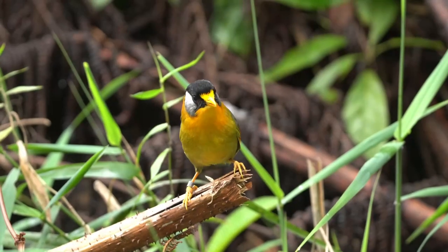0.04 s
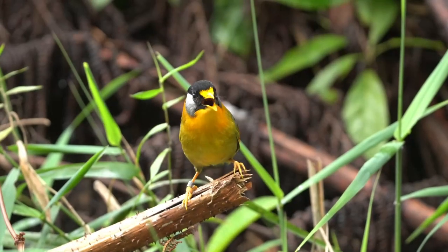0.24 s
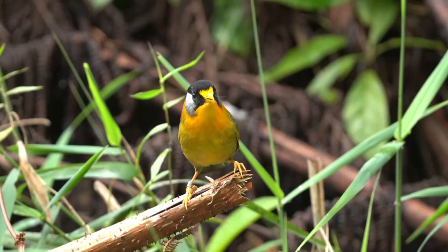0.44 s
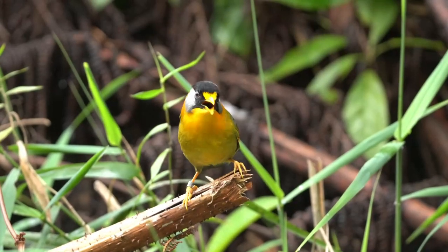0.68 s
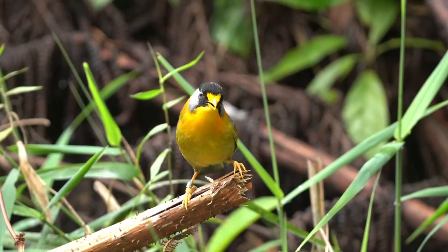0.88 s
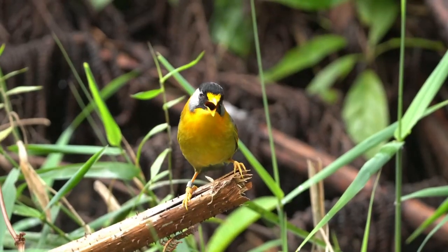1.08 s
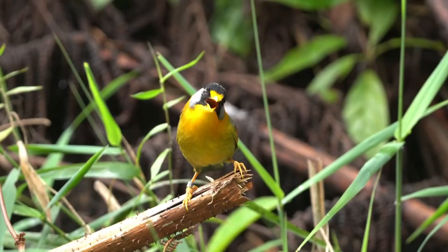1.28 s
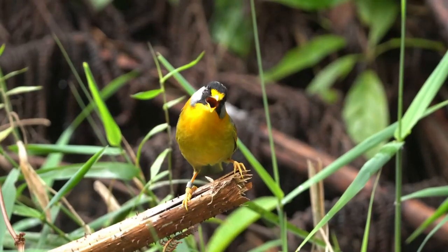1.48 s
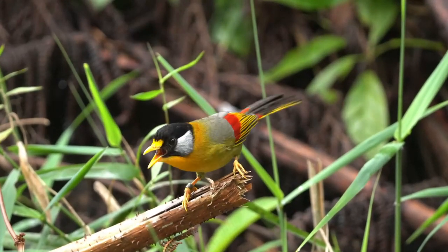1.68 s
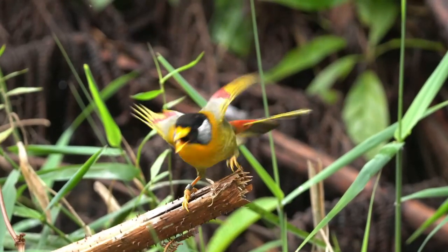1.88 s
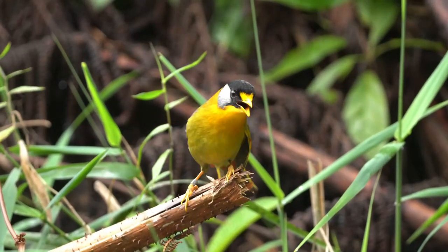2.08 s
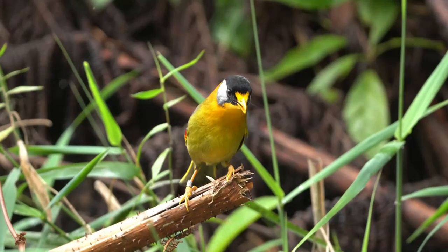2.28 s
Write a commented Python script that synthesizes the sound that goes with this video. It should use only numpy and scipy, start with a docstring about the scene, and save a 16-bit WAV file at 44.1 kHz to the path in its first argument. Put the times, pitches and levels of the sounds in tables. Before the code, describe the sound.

A small bird scolds close by with short, harsh, high notes: two at about 0.3 seconds, three around 0.7, five from 1.1, then a rapid run from 1.5 to 2. Soft wing flicks and claw ticks on bark surround one last note near 2.1 seconds. A faint low rush swells and fades between 0.8 and 1.7. Thin distant bird calls, insect hiss and faint outdoor rumble continue throughout.

```python
"""The echo of an earlier note dies away in a thicket. From 0.2 s a small bird scolds in growing bursts
of short, harsh notes: each one whistle that warbles fast as it climbs, then drops; leaves scatter it.
A low rush swells and fades from 0.8 to 1.7 s. Near 2 s the bird hops round, wings flicking, claws
ticking on bark, and gives one last note. Throughout: thin high calls of other birds, a band of
insect hiss, faint outdoor rumble."""
import sys
import numpy as np
from scipy import signal
from scipy.fft import rfft, irfft
from scipy.io import wavfile
from scipy.ndimage import uniform_filter1d, minimum_filter1d

SR = 44100
rng = np.random.default_rng(int(sys.argv[2]) if len(sys.argv) > 2 else 0)


def int16_out(signal):
    """Quantize to a 16-bit WAV file."""
    q = np.round(np.clip(np.atleast_2d(signal).T, -1, 1) * 32767)
    wavfile.write(sys.argv[1], SR, q.astype(np.int16))


N = 108045

# scolding notes: top crest t/s, climb/s, drop/s, top f/Hz, level/dB, overtones/dB, left-right/dB
SCOLD_NOTES = [(0.2692, 0.045, .021, 4690, -11, -4.5, 4), (0.328, .017, .018, 4100, -13.5, -1, 4.5),
               (0.677, .050, 0.018, 4595, -11, -3, 5), (0.7359, 0.03, 0.01356, 4664, -12.5, 3, 2.5),
               (.806, .025, .019, 4334, -13, 0.5, 1.5), (1.0985, 0.048, .020, 4526, -11, -6, 3.5),
               (1.153, .029, 0.02, 4449, -11.5, 1.5, 4), (1.2204, .026, 0.015, 4196, -13.5, 0.5, 3),
               (1.2884, 0.026, .012, 4569, -11.5, -3, -1), (1.3502, .027, 0.011, 4630, -11, -1.5, 1.5),
               (1.5469, .042, .016, 4394, -11.5, -6, 3), (1.596, .026, .019, 4036, -10.5, -1.5, 3),
               (1.6545, .027, .016, 4290, -11, -1, 5), (1.7056, .028, .015, 4187, -12, 1, 4),
               (1.777, .022, .017, 4294, -11.5, 3.5, 5.5), (1.8346, 0.022, .015, 3750, -14.5, 7, 2),
               (1.9056, 0.02184, .015, 3914, -15, 2, 4), (1.9695, .026, .012, 4007, -14.5, 3.5, 0),
               (2.009, .018, .019, 4050, -15.5, 5, 3), (2.149, .040, .016, 4386, -9.5, -6.5, 2.5)]
# throat and beak resonances, with ground-reflection notches near 2.9 and 4.8 kHz: f/Hz, gain/dB
VOICE_COLOUR = [(1100, -19), (1550, -12), (1800, -30.5), (2150, -9.5), (2450, -5), (2650, -13), (2950, -21),
                (3150, -11), (3520, -6), (3850, -8.5), (4200, -4), (4520, -1.5), (4830, -15.5), (5270, -5),
                (5550, -13), (6100, -28), (6800, -25), (7500, -17.5), (8600, -45), (15000, -41)]
# air noise in the voice: f/Hz, level/dB
RASP_SPECTRUM = [(300, -18.5), (1200, -14.5), (2500, -6), (5000, 8.5), (7500, -5.5), (9500, -7.5),
                 (13500, -13.5), (15500, -20)]
# direct sound at the ears: f/Hz, left-right/dB
DIRECT_BALANCE = [(2400, -5), (3500, 3), (4000, -1), (4450, 15.5), (5300, 8.5), (8000, -6), (14000, 17)]
# foliage echo: f/Hz, gain/dB
FOLIAGE_GAIN = [(2400, -6.5), (3400, -2), (4400, 2), (5300, 3.5), (7000, 8), (12000, -16)]
# echo of an earlier note: f/Hz, level/dB
RING_SPECTRUM = [(3000, -11), (3900, -5), (4400, 2), (4800, -9), (7000, -25)]
# wing flicks, feather rustles: t/s, length/s, level/dB
WING_FLICKS = [(0.257, 0.013, -42), (0.48, 0.013, -49), (1.751, 0.0064, -33), (2, 0.026, -39),
               (2.023, 0.0055, -38), (2.032, 0.08, -45)]
# wing noise: f/Hz, level/dB
WING_SPECTRUM = [(150, -7), (600, -4.5), (1300, 3.5), (2500, 2), (6000, 8.5), (15000, -26)]
# claws on bark: t/s, level/dB
CLAW_TICKS = [(2.023, -38), (2.263, -39.5), (2.327, -39.5), (2.365, -38.5)]
# claw noise: f/Hz, level/dB
CLAW_SPECTRUM = [(1500, -22), (5000, -1), (8000, -2), (15000, -18)]
# other birds: t/s, length/s, first f/Hz, last f/Hz, level/dB
OTHER_CALLS = [(0.219, .03, 7130, 6330, -48.5), (0.375, 0.058, 6300, 6220, -49),
               (.47, 0.037, 6480, 5560, -52.5), (0.536, 0.053, 6080, 5850, -49.5),
               (.60, 0.038, 7500, 7400, -49), (0.869, .125, 7600, 6950, -52),
               (.975, 0.047, 6330, 5870, -51), (1.195, 0.1145, 7650, 7260, -58),
               (1.615, .04, 7190, 6724, -40.5), (1.893, 0.0417, 7050, 6270, -39),
               (2.082, .025, 6736, 6300, -46.5), (2.188, 0.05, 6730, 6300, -37),
               (2.266, .05, 6350, 6200, -44), (2.378, 0.036, 6500, 6200, -44.5)]
# outdoor rumble: f/Hz, level/dB
RUMBLE_SPECTRUM = [(15, -52), (25, -13), (43, -2.5), (96, -3.5), (164, -5.5), (189, -3.5), (282, -7.5),
                   (421, -9), (1040, -10.5), (1120, -11), (3000, -14), (3900, -49), (6600, -120)]
# rumble, side relative to mid: f/Hz, gain/dB
RUMBLE_SIDE = [(60, -14), (120, -13), (250, -7), (600, -1), (3000, -1)]
# low rush, envelope: t/s, level/dB
RUSH_ENVELOPE = [(.8, -77), (1.0, -53), (1.25, -55.5), (1.45, -56.5), (1.7, -74)]
# low rush: f/Hz, level/dB
RUSH_SPECTRUM = [(120, -65), (220, -3.5), (280, 1.5), (380, -5), (520, -11), (900, -15.5)]
# insect hiss: f/Hz, level/dB
INSECT_SPECTRUM = [(2000, -10), (3300, 2.5), (4300, -4.5), (5200, 0), (7000, -6.5), (8500, -3),
                   (10200, 7.5), (11200, 1.5), (12200, -10.5), (15500, -17)]

WARBLE_HZ, TROUGH_RATIO = 115.9, 0.68
CREST_BASE_HZ, TROUGH_BASE_HZ, END_HZ = 3271, 2952, 1240
LOWERING_HZ_PER_S = 17000  # longer climbs start further below the base
ATTACK_S, PLUNGE_S, RELEASE_S = 0.01, 0.017, 0.0016
LEAD_IN_DB, FADE_DB = -9, -14
LEAVES_DB, LEAVES_T60_S = -4, 0.07


def whistle_contours(t):
    """Per note, the pitch swings between trough and crest while it climbs, then plunges."""
    pitch_hz = np.full(N, float(TROUGH_BASE_HZ))
    level, brightness, balance_db = np.zeros((3, N))
    for peak_s, climb_s, drop_s, top_hz, db, overtones_db, pan_db in SCOLD_NOTES:
        on = (t > peak_s - climb_s) & (t < peak_s + drop_s)
        offset_s = t[on] - peak_s
        before, after = np.maximum(-offset_s / climb_s, 0), np.maximum(offset_s / drop_s, 0)
        plunge = np.maximum(1 - (drop_s - offset_s) / min(PLUNGE_S, drop_s), 0)
        lowering_hz = LOWERING_HZ_PER_S * climb_s
        crest_hz = top_hz - (top_hz - CREST_BASE_HZ + lowering_hz) * before ** 2
        crest_hz -= (top_hz - END_HZ) * plunge ** 1.4
        low_hz = top_hz * TROUGH_RATIO
        trough_hz = low_hz - (low_hz - TROUGH_BASE_HZ + lowering_hz) * (before + after) ** 1.3
        trough_hz = np.minimum(trough_hz, crest_hz)
        pitch_hz[on] = trough_hz + (crest_hz - trough_hz) * np.cos(np.pi * WARBLE_HZ * offset_s) ** 2
        effort = undb(LEAD_IN_DB * before ** 1.83 + FADE_DB * after ** 1.83)
        attack = np.minimum((offset_s + climb_s) / ATTACK_S, 1)
        release = np.minimum((drop_s - offset_s) / RELEASE_S, 1)
        level[on] = undb(db) * effort * attack * release
        brightness[on] = undb(overtones_db) * np.sqrt(effort)
        balance_db[on] = pan_db
    return pitch_hz, level, brightness, balance_db


def scolding_bird(t):
    """Throat, beak and a ground reflection colour a whistle; air adds rasp; foliage echoes both."""
    pitch_hz, level, brightness, balance_db = whistle_contours(t)
    pitch_hz *= 1 + 0.0199 * walk(rate_hz=1500) + 0.01205 * walk(rate_hz=165.4)  # jitter, wander
    level *= undb(2.27 * walk(rate_hz=640))  # shimmer
    phase = 2 * np.pi * np.cumsum(pitch_hz) / SR
    overtones = undb(-3) * np.sin(2 * phase) + undb(-11) * np.sin(3 * phase)
    voice = colour(level * (np.sin(phase) + brightness * overtones), VOICE_COLOUR)
    rasp = undb(-26.5) * level * np.sqrt(brightness) * noise(RASP_SPECTRUM)
    ear_curves = [[(hz, ear * db / 2) for hz, db in DIRECT_BALANCE] for ear in (1, -1)]
    direct = np.array([colour(voice + rasp, curve) for curve in ear_curves]) * pan(balance_db)
    short_echo = undb(LEAVES_DB) * scatter(voice, LEAVES_T60_S)
    long_echo = undb(-7.5) * scatter(colour(voice, FOLIAGE_GAIN), t60_s=0.48)
    rasp_echo = undb(8) * scatter(rasp, t60_s=0.28)
    return direct + short_echo + long_echo + rasp_echo


def thicket_ring(t):
    """An earlier note's echo dies away near the pitch of the loudest crests."""
    ring = np.array([noise(RING_SPECTRUM) for _ in range(2)])
    return undb(-45.5) * ring * decay(t, t60_s=0.37)


def hop(t, tick_s=0.0017):
    """Wings push puffs of air; claws tick on the branch."""
    puffs = sum(undb(db) * arch(t, start_s, length_s) for start_s, length_s, db in WING_FLICKS)
    ticks = sum(undb(db) * (t > start_s) * np.exp(-np.abs(t - start_s) / tick_s)
                for start_s, db in CLAW_TICKS)
    direct = puffs * noise(WING_SPECTRUM) + ticks * noise(CLAW_SPECTRUM)
    return direct * pan(db=-11.5) + undb(LEAVES_DB) * scatter(direct, LEAVES_T60_S)


def other_birds(t):
    """Thin, slightly falling, wavering whistles from deeper in the thicket."""
    calls = np.zeros(N)
    waver = 1 + 0.038 * walk(rate_hz=1150)
    for start_s, length_s, first_hz, last_hz, db in OTHER_CALLS:
        hz = np.interp(t, [start_s, start_s + length_s], [first_hz, last_hz]) * waver
        calls += undb(db) * arch(t, start_s, length_s) * np.sin(2 * np.pi * np.cumsum(hz) / SR)
    return calls * pan(db=10) + undb(6.5) * scatter(calls, t60_s=0.2)


def rumble():
    """Outdoor air, alike at both ears in the bass."""
    side = colour(noise(RUMBLE_SPECTRUM), RUMBLE_SIDE)
    return undb(-56.5) * (noise(RUMBLE_SPECTRUM) + np.array([side, -side]))


def low_rush(t):
    """Low noise swells and fades."""
    level = undb(np.interp(t, *np.array(RUSH_ENVELOPE).T))
    mid, side = noise(RUSH_SPECTRUM), 0.35 * noise(RUSH_SPECTRUM)
    return level * (mid + np.array([side, -side]))


def insects():
    """Steady high hiss; the level flickers slightly."""
    hiss = np.array([noise(INSECT_SPECTRUM) * undb(-0.6 * walk(rate_hz=25)) for _ in range(2)])
    return undb(-50.5) * pan(db=-2.5) * hiss


def scatter(x, t60_s):
    """Countless small decaying echoes after a 1.5 ms gap, different at each ear."""
    t = np.arange(SR) / SR
    tail = rng.standard_normal((2, SR)) * decay(t, t60_s) * (t > 0.0015)
    tail /= np.sqrt((tail ** 2).sum(1, keepdims=True))
    return signal.fftconvolve(x[None], tail, axes=1)[:, :N]


def undb(db):
    return 10 ** (np.asarray(db) / 20)


def decay(t, t60_s):
    return np.exp(-np.log(1000) * t / t60_s)


def gain_at(curve, hz):
    """Linear gain from a (f/Hz, level/dB) curve, log-frequency axis."""
    curve_hz, curve_db = np.array(curve, float).T
    return undb(np.interp(np.log(np.maximum(hz, 1)), np.log(curve_hz), curve_db))


def colour(x, curve):
    """Filter by a (f/Hz, gain/dB) curve."""
    return irfft(rfft(x) * gain_at(curve, np.arange(N // 2 + 1) * SR / N), N)


def noise(spectrum):
    """Shaped noise, rms 1; 12 dB/octave roll-off outside the spectrum."""
    hz = np.arange(N // 2 + 1) * SR / N
    edges = np.minimum(hz / spectrum[0][0], 1) ** 2 * np.minimum(spectrum[-1][0] / (hz + 1), 1) ** 2
    x = irfft(rfft(rng.standard_normal(N)) * gain_at(spectrum, hz) * edges, N)
    return x / x.std()


def walk(rate_hz):
    """Smooth random signal, standard deviation 1."""
    span = int(SR / rate_hz)
    x = uniform_filter1d(uniform_filter1d(rng.standard_normal(N), span), span)
    return x / x.std()


def pan(db):
    """Stereo gains for a left-right level difference."""
    return undb(np.array([[1], [-1]]) * db / 2)


def arch(t, start_s, length_s):
    """Rounded envelope, 0 to 1 and back."""
    return np.sqrt(np.abs(np.sin(np.pi * np.clip((t - start_s) / length_s, 0, 1))))


def scene():
    t = np.arange(N) / SR
    birds = scolding_bird(t) + thicket_ring(t) + other_birds(t) + hop(t)
    return birds + rumble() + low_rush(t) + insects()


def record(dry, ceiling=0.65, limiter_s=0.0022, cutoff_hz=15700):
    """A fast limiter holds down the loudest crests; a steep low-pass cuts the top."""
    span = int(limiter_s * SR)
    needed_gain = ceiling / np.maximum(np.abs(dry).max(0), ceiling)
    gain = uniform_filter1d(minimum_filter1d(needed_gain, span), span)
    lowpass = signal.ellip(10, 0.2, 80, cutoff_hz, fs=SR, output="sos")
    return signal.sosfilt(lowpass, dry * gain)


dry = scene()
out = record(dry)
int16_out(out)
```